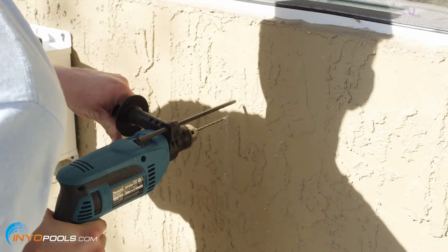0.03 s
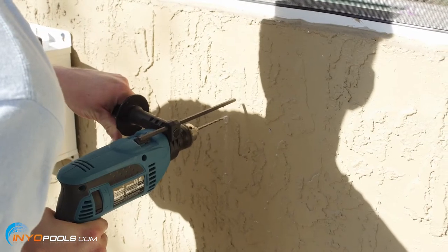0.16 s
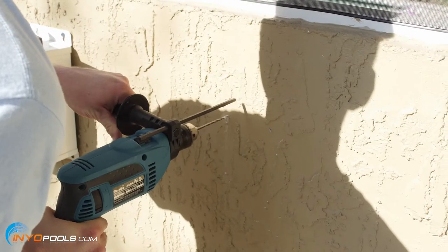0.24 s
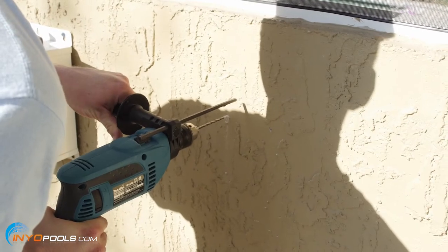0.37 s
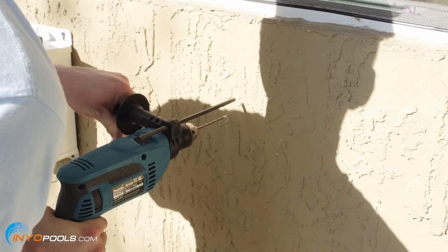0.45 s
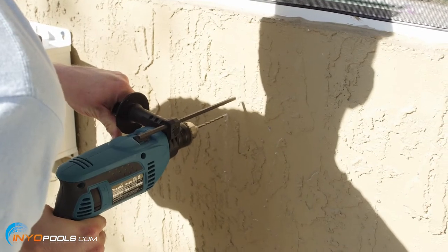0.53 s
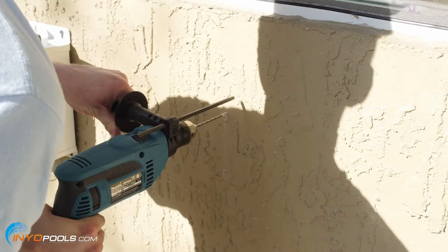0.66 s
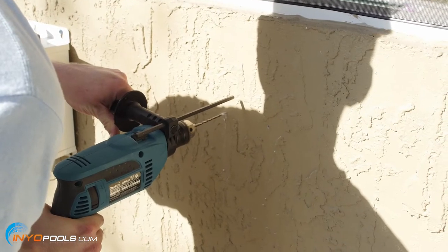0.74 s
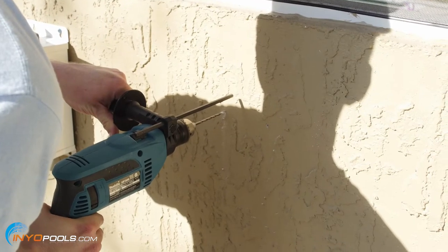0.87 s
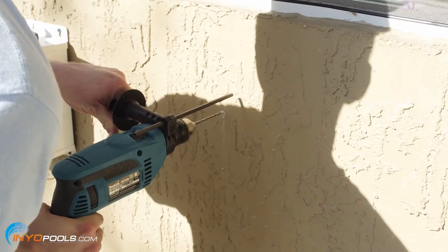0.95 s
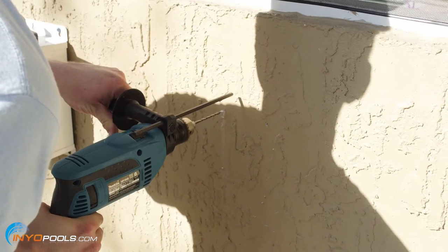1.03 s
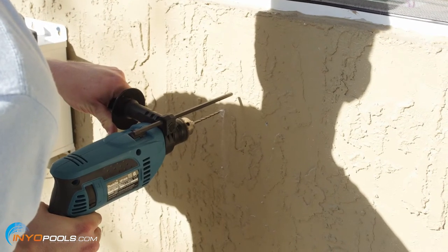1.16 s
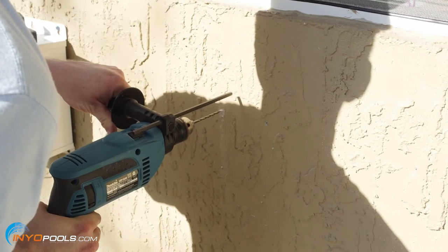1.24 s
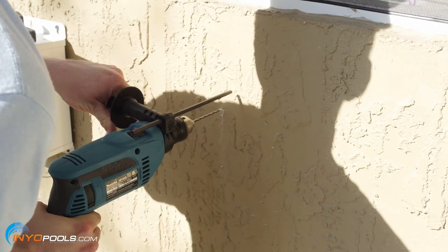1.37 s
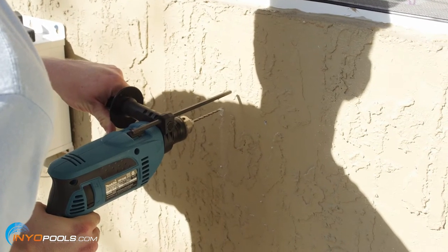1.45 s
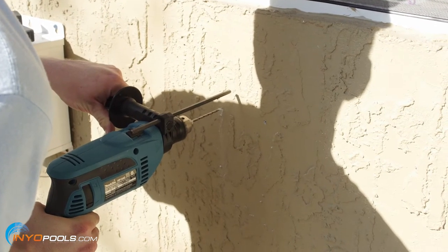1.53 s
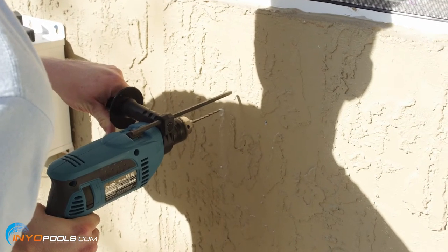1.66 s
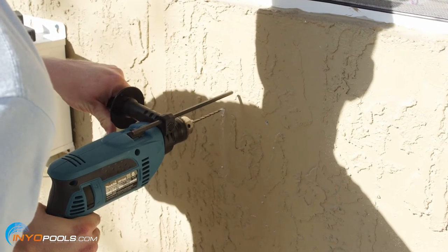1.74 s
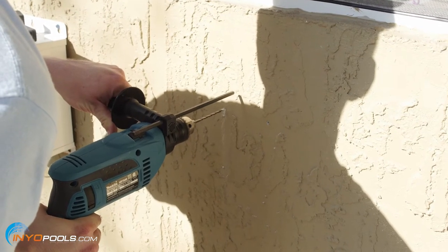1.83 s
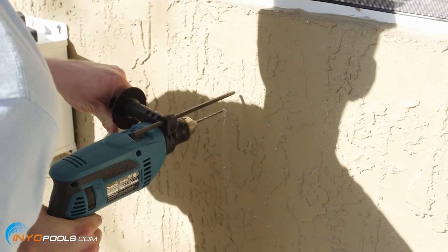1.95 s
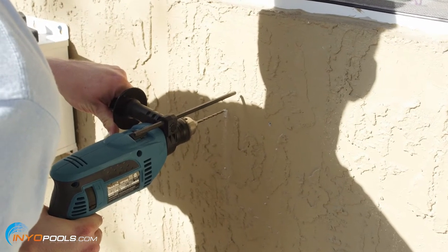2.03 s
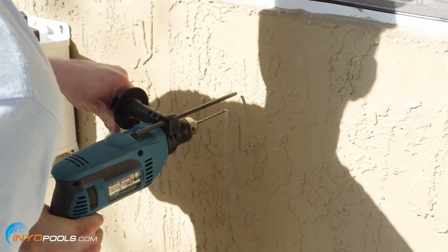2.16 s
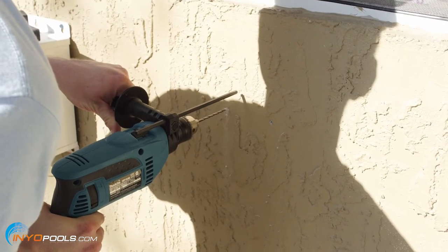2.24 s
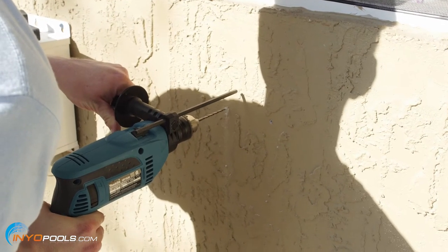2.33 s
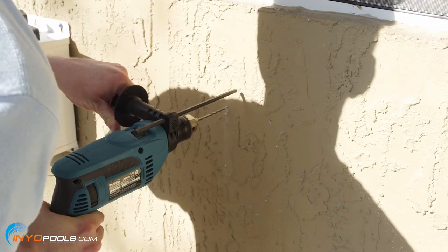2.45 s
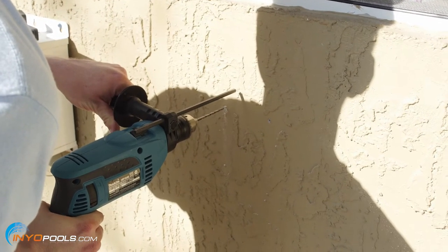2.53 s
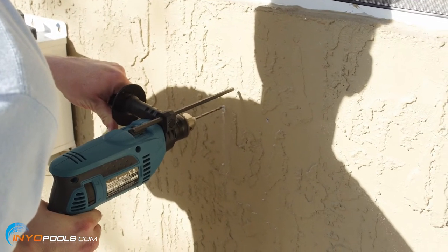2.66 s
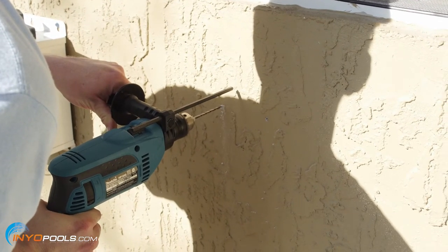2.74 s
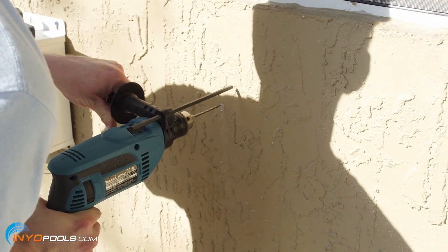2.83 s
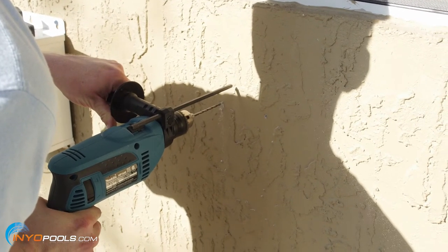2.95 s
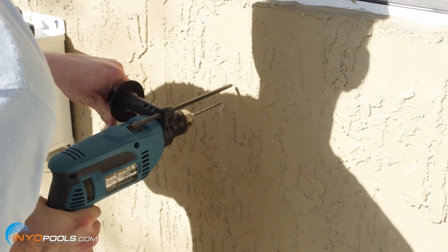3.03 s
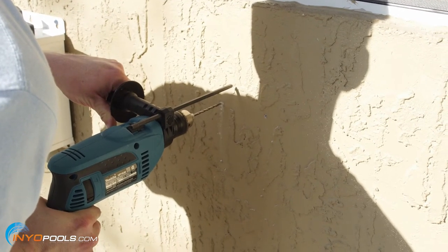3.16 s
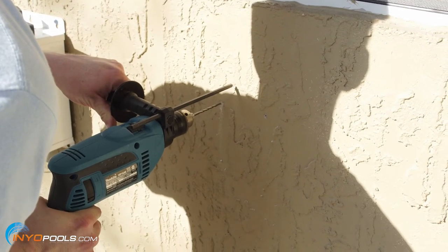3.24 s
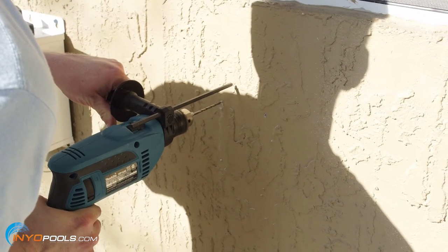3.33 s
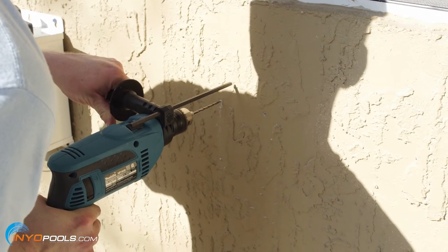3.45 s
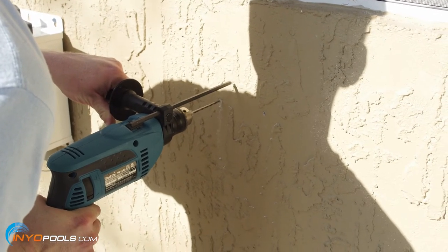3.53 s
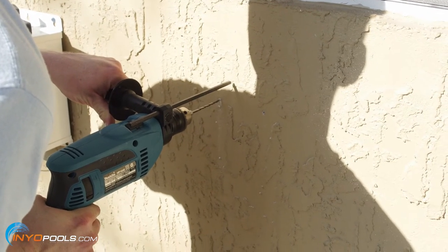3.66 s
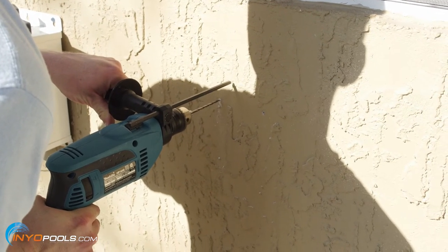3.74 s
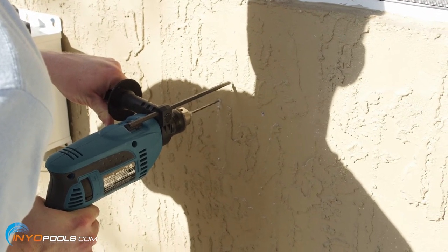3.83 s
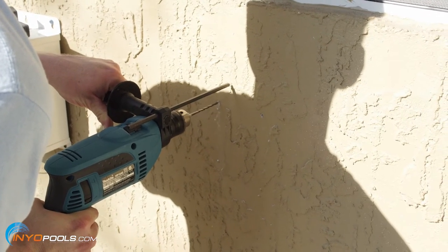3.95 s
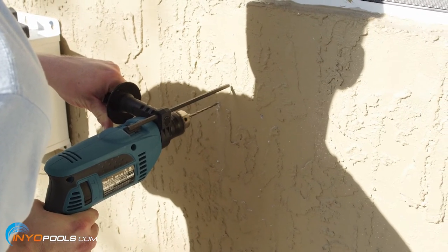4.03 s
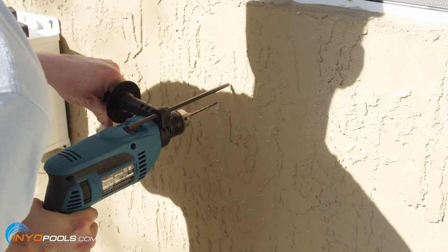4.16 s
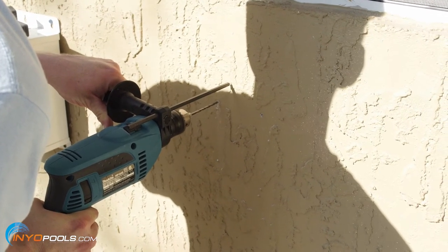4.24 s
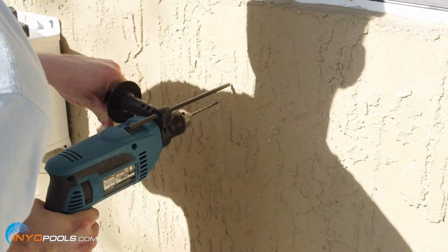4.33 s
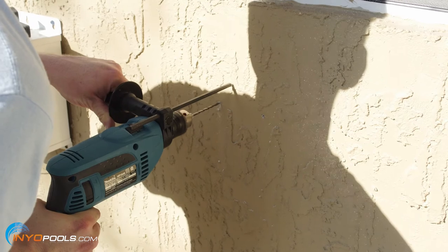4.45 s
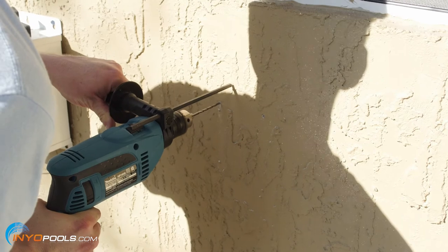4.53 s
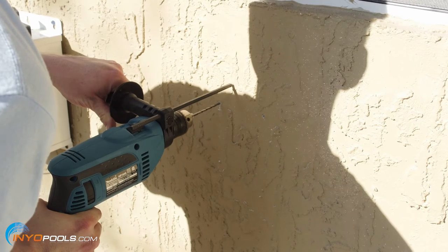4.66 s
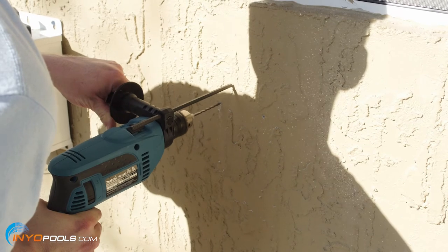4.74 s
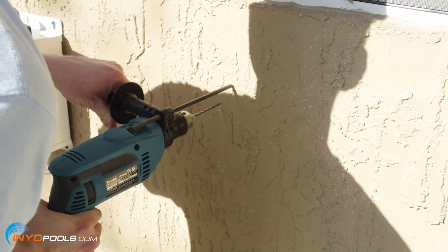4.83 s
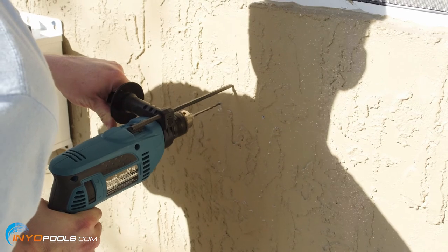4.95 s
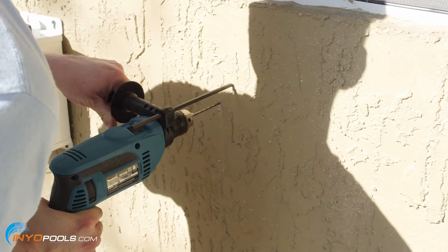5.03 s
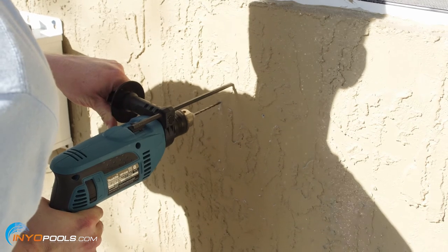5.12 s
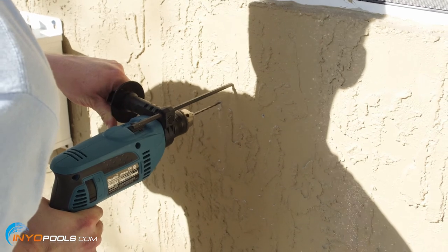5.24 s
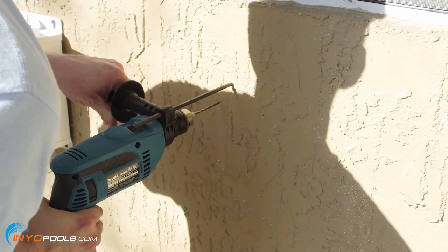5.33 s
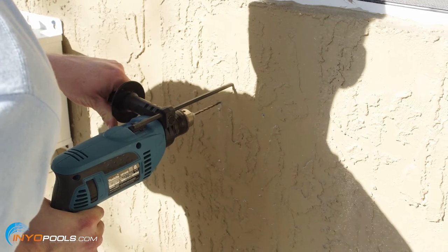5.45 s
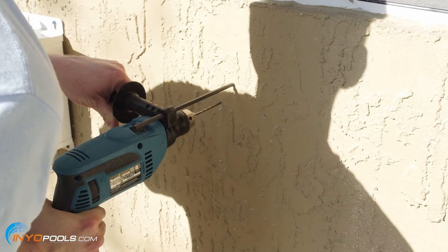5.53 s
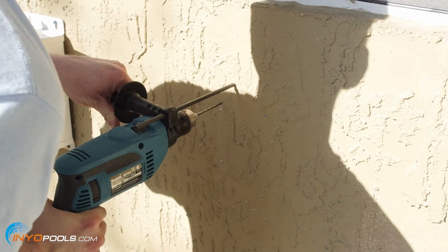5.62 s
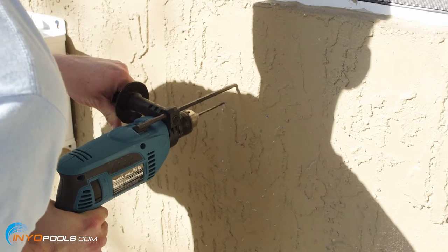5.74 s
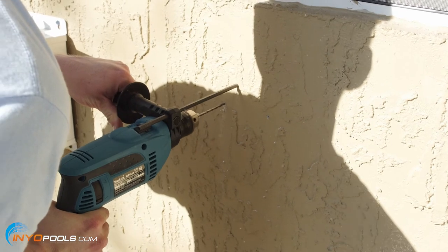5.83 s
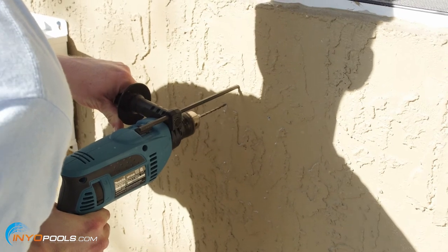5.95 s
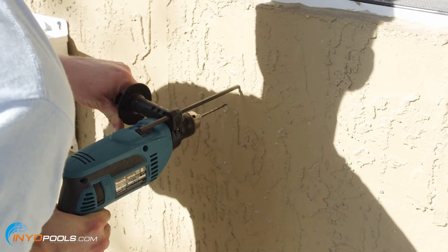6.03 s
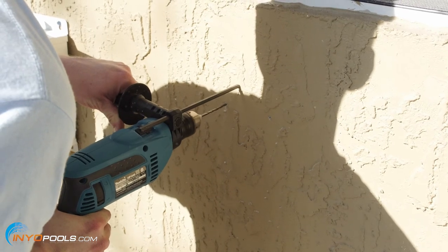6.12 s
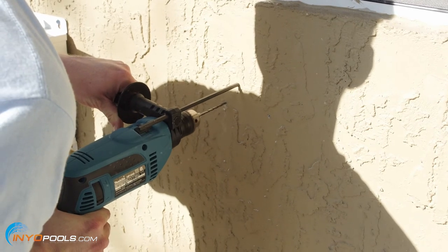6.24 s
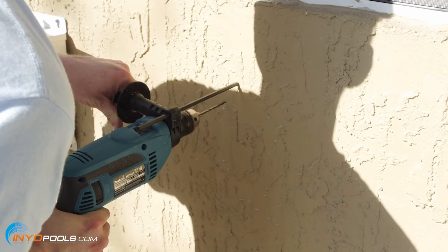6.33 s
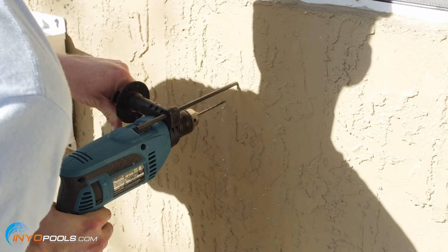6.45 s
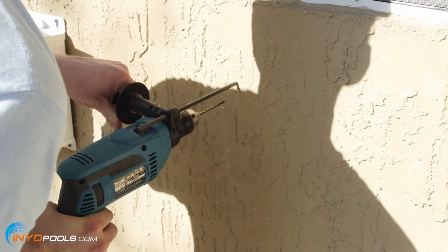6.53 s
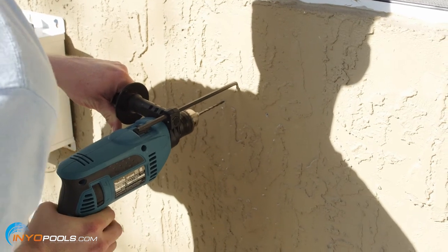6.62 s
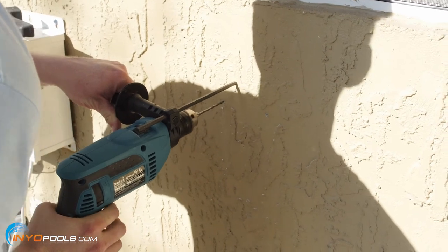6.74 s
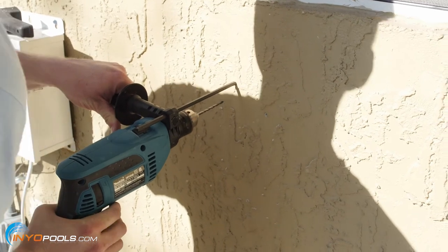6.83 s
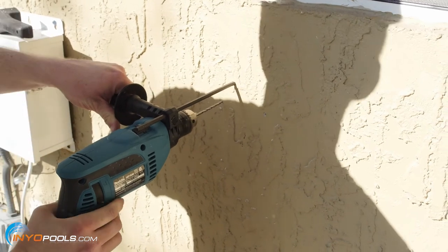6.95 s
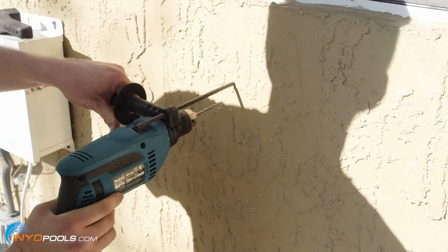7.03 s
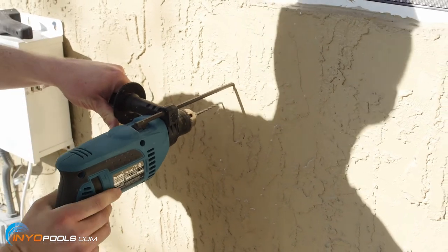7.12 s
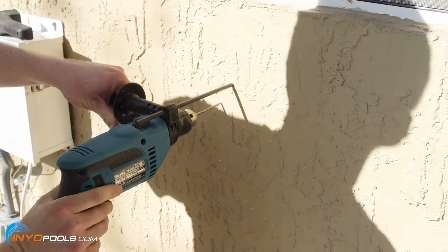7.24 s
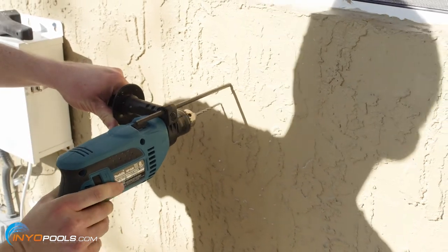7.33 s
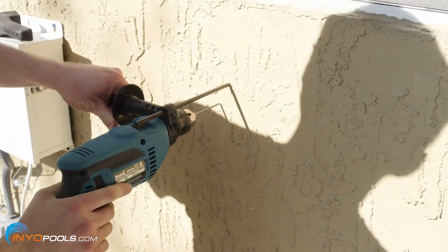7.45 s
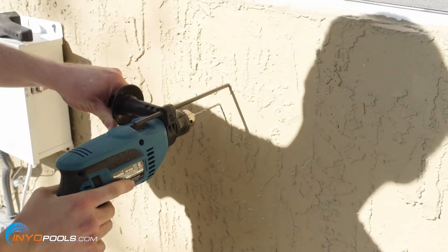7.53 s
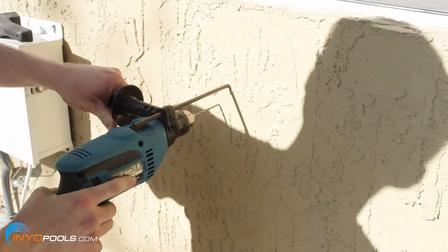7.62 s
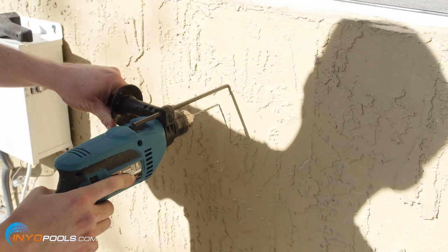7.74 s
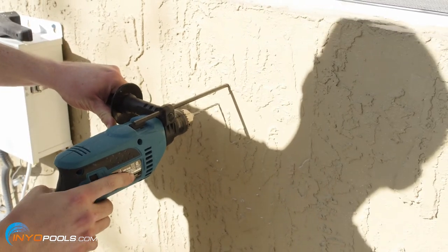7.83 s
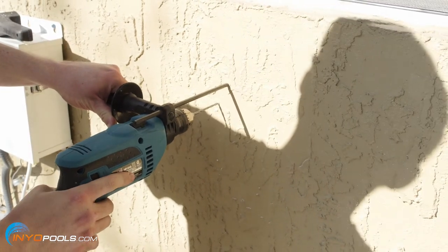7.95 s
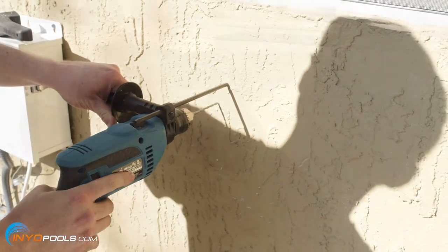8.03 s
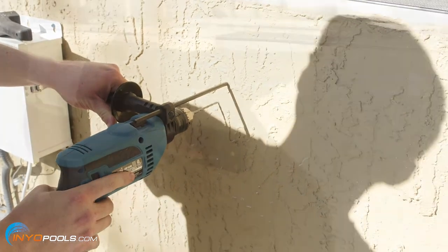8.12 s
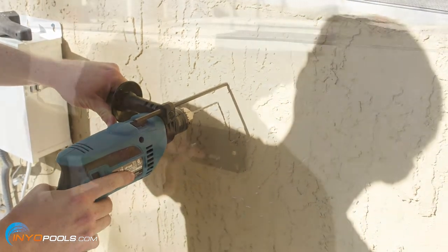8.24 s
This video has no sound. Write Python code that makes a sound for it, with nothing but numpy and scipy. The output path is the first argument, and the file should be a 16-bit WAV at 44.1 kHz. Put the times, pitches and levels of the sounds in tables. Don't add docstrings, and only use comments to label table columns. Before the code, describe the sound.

A loud electric hammer drill is already running against a stucco wall outdoors, heard close, dry and in one channel. From 0 to 0.8 seconds the bit skates: around 150 to 165 blows a second, with irregular chatter and small skips. It then catches and the rough buzz climbs to about 200 blows a second by 1.3, dips slightly, and rises to nearly 220 by 3.3. Until 5.8 it drones on fairly steadily, hard and metallic, with crushed grit and an increasingly bright steel ring. From 5.8 the hole deepens, blows weaken and a loose depth rod rattles; around 6.4 the pitch jumps as pressure eases. At about 6.55 the trigger is released, the blows dull and stop by 6.7, and motor whines with fan rush slide steeply down, vanishing around 7.7. A faint low yard hum remains, fading out by the end near 8.4.

```python
import sys
import numpy as np
from scipy import signal
from scipy.fft import rfft, irfft
from scipy.io import wavfile

SR = 44100
rng = np.random.default_rng(int(sys.argv[2]) if len(sys.argv) > 2 else 0)


def dump_mix(stems):
    frames = np.atleast_2d(stems).T
    limited = np.clip(frames, -1, 1)
    pcm = np.round(limited * 32767).astype(np.int16)
    wavfile.write(sys.argv[1], SR, pcm)


def level_to_linear(level):
    exponent = np.asarray(level, float) / 20
    return 10 ** exponent


N = 365148

RELEASE_S = 6.585


def rms_one(x):
    return x / np.sqrt(np.mean(x ** 2) + 1e-20)


def in_time(rows):
    s, *columns = np.transpose(rows)
    return [np.interp(np.arange(N) / SR, s, c) for c in columns]


def ramp(start_s, length_s):
    return np.clip((np.arange(N) / SR - start_s) / length_s, 0, 1)


def since(start_s):
    return np.maximum(np.arange(N) / SR - start_s, 0)


def colour(x, spectrum):
    hz, level_db = np.transpose(spectrum)
    bin_hz = np.arange(N // 2 + 1) * SR / N + 1
    gain = level_to_linear(np.interp(np.log(bin_hz), np.log(hz), level_db))
    return rms_one(irfft(rfft(x) * gain, N))


def noise(spectrum):
    return colour(rng.standard_normal(N), spectrum)


def resonate(x, hz, width_hz):
    r = np.exp(-np.pi * width_hz / SR)
    zeros = [(1 - r * r) / 2, 0, (r * r - 1) / 2]
    poles = [1, -2 * r * np.cos(2 * np.pi * hz / SR), r * r]
    return signal.lfilter(zeros, poles, x + 1e-18)


def hum_noise(hz, width_hz, hz_2, width_2_hz):
    return rms_one(resonate(resonate(rng.standard_normal(N), hz, width_hz), hz_2, width_2_hz))


def highpass(x, order, hz):
    return signal.sosfilt(signal.butter(order, hz, "high", fs=SR, output="sos"), x)


def clicks(at, sizes):
    return np.bincount(np.clip(at, 0, N - 1), sizes, N)


def struck(modes, at, turn, wobble_db, spread_db, lag_ms, scatter_ms):
    out = np.zeros(N)
    for hz, width_hz, level_db, side in modes:
        chance = rng.standard_normal((len(at), 2))
        sizes = level_to_linear(level_db + wobble_db * np.cos(turn + side) + spread_db * chance[:, 0])
        late = np.round((lag_ms + scatter_ms * chance[:, 1]) * SR / 1000).astype(int)
        out += resonate(resonate(clicks(at + late, sizes), hz, width_hz), hz, width_hz)
    return rms_one(out)


def yard():
    # (frequency [Hz], density [dB per Hz])
    distance = [(15, -50.5), (25, -16), (117, -2.5), (190, -10.5), (286, -1), (431, -7), (536, -7),
                (1410, -20.5), (2770, -21.5), (8000, -31.5), (10400, -46.5), (17600, -120)]
    hum = hum_noise(119.5, 14, 119.5, 16)
    ducked_db = -6.5 * (1 - ramp(RELEASE_S, 0.6))
    fade_db = -44 * since(7.77)
    level_db = -59.5 + ducked_db + fade_db
    return level_to_linear(level_db) * (level_to_linear(-6.5) * noise(distance) + level_to_linear(-12.5) * hum)


def coast():
    # (time [s], commutator rate [bars per s])
    spin = [(6.5, 4250), (6.712, 3470), (6.826, 3115), (7.056, 2225), (7.33, 1130), (7.45, 735),
            (7.55, 460), (7.75, 60)]
    # (order [sixths of the bar rate], level [dB])
    whines = [(2, -2), (3, -1), (4, -7), (5, -12), (6, 3), (8, -12), (12, 2), (18, -2), (24, -2), (30, -5),
              (36, -8), (42, -9), (48, -9), (54, -11), (60, -12), (72, -14)]
    # (frequency [Hz], gain [dB])
    housing = [(250, -26), (450, -14), (580, 3), (780, -6), (1060, 4), (1350, -7), (1680, 5), (1950, -3),
               (2350, 4), (3100, -3), (4200, -12), (5500, -7), (10000, -8), (16000, -13)]
    # (frequency [Hz], density [dB per Hz])
    fan = [(88, -74), (150, -28.5), (723, -15.5), (1030, -9), (1220, -10), (2320, -13), (2660, -16),
           (6620, -26), (8530, -28.5), (9580, -27.5), (15600, -40.5)]
    # (frequency [Hz], width [Hz], level [dB], dying slope [dB per s])
    gear_modes = [(4200, 670, -55.5, -81), (3320, 1060, -53, -40), (1560, 440, -48.5, -60)]
    dying_s = since(7.308)
    dying_db = -64 * dying_s
    sixth_hz = in_time(spin)[0] / 6
    phase = 2 * np.pi * np.cumsum(sixth_hz) / SR
    phase = phase + .035 * np.sin(phase / 4)

    whine = np.zeros(N)
    housing_hz, housing_db = np.transpose(housing)
    for order, level_db in whines:
        flutter = rms_one(resonate(rng.standard_normal(N), 5.5, 30))
        whine_hz = order * sixth_hz
        passed_db = np.interp(np.log(whine_hz), np.log(housing_hz), housing_db)
        level = level_to_linear(level_db + passed_db + 2.8 * flutter)
        whine += level * np.sin(order * phase) * (whine_hz < 15720)

    rush = noise(fan) * (1 + 0.11 * np.cos(phase / 4))
    hum = hum_noise(1040, 110, 910, 300)
    hum_db = -39 - 11 * since(RELEASE_S) + dying_db
    gears = np.zeros(N)
    for hz, width_hz, db, db_per_s in gear_modes:
        gears += level_to_linear(db + db_per_s * dying_s) * hum_noise(hz, width_hz, hz, width_hz)
    on = ramp(6.575, .03) * (1 - ramp(7.63, .15))
    motor = level_to_linear(-47 + dying_db) * whine + level_to_linear(-43 + dying_db) * rush + level_to_linear(hum_db + 3.5) * hum
    return on * (gears + motor)


def ratchet():
    # (time [s], blow rate [Hz])
    speed = [(0.0, 158), (0.2, 162), (0.4, 147), (0.6, 154.3), (0.67, 164.5), (0.78, 174), (0.86, 186),
             (1.3, 198), (1.7, 189), (2.0, 191.5), (2.47, 205.5), (3.3, 218.5), (3.5, 219), (4.9, 210),
             (5.17, 223), (5.95, 220.3), (6.46, 258), (6.72, 205)]
    # (time [s], share [blows])
    stumbles = [
        (0.496, 0.28),
        (0.601, 0.21),
        (.8, 0.52),
        (0.831, -.3),
        (6.346, 0.27),
    ]
    rate_hz = in_time(speed)[0]
    blows = np.cumsum(rate_hz) / SR
    for s, share in stumbles:
        blows = blows + share * ramp(s, .012)
    at = np.flatnonzero(np.diff(np.floor(blows)))
    turn = 2 * np.pi * np.arange(len(at)) / 16
    runout = np.clip(0.57 + 0.13 * at / SR, 0, 1)
    slip_ms = .025 * rng.standard_normal(len(at))
    slip_ms = slip_ms + .11 * runout * np.cos(turn + 2.6) + .04 * np.cos(6.9 * turn)
    at = at + np.round(slip_ms * SR / 1000).astype(int)
    return rate_hz, blows, at, turn, runout


def seating():
    # (time [s], seating [0-1])
    seat = [(0, 0.46), (0.9, 0.26), (2.2, 0.4), (2.5, 0.6), (3.5, .9), (5.0, 1), (6.0, 1), (6.3, .8),
            (6.6, 0.9)]
    return in_time(seat)[0]


def skating():
    return 1 - ramp(0.792, 0.1)


def bottomed():
    return ramp(5.81, 0.49)


def released_db():
    return -19 * ramp(RELEASE_S, .035)


def blow_level_db():
    return -14.5 - 3.5 * bottomed() + released_db()


def panel(hz):
    # (frequency [Hz], width [Hz], level [dB])
    panel_modes = [(206.8, 20.3, -29.5), (241.6, 43, -32), (353, 87, -32.5), (513, 166, -21),
                   (644, 80, -25.5), (801.4, 170, -27.5), (839, 51, -15.5), (917, 23, -9)]
    power = 0
    for mode_hz, width_hz, db in panel_modes:
        power = power + (level_to_linear(db) / (1 + (2 * (hz - mode_hz) / width_hz) ** 2)) ** 2
    return np.sqrt(power)


def thump(rate_hz, blows):
    order_db = [0, -1.5, -6, -10]
    order_lead = [.04, .18, .18, .18]
    order_eases = [0.73, 0.8, 0.32, 0.96]
    eased_db = -15.5 * ramp(6.32, .08)
    out = np.zeros(N)
    for k, (db, lead, eases) in enumerate(zip(order_db, order_lead, order_eases)):
        level = np.sqrt(2) * level_to_linear(db + eases * eased_db) * panel((k + 1) * rate_hz)
        out += level * np.sin(2 * np.pi * (k + 1) * (blows + lead) + 1.404 * k)
    return level_to_linear(.6 * released_db()) * out


def wall_ring(at, turn, runout):
    # (frequency [Hz], width [Hz], level [dB], strong side [rad])
    wall = [(971.6, 160, 0, 3.2)]
    level_db = -22 + 3.5 * seating() + 4 * skating() - 5.5 * bottomed() + released_db()
    ring = struck(wall, at, turn, wobble_db=2.5 * runout, spread_db=1.0, lag_ms=0.1, scatter_ms=0.015)
    return level_to_linear(level_db - 5.5) * ring


def case_ring(at, turn, runout):
    # (frequency [Hz], width [Hz], level [dB], strong side [rad])
    gear_case = [(2032, 230, -6, 4.5), (2300, 148, 3.5, 1.06), (2955, 174, -3.5, 0.5), (3222, 650, -3, 2),
                 (4540, 510, -7, 0.1), (4770, 99, -6.5, 11.5), (5208, 480, -4.5, 4.5),
                 (6110, 260, -19.5, 3.7), (6790, 140, -9, 3), (7680, 150, -30.5, -2.1)]
    # (frequency [Hz], width [Hz], level [dB], strong side [rad])
    wall_face = [(1079.5, 74, -2.9, 2), (1268, 284, 2, 1.97), (1417, 220, -0.69, 3.5)]
    # (frequency [Hz], width [Hz], level [dB], strong side [rad])
    depth_rod = [(1850, 300, 0, 0), (2050, 300, -2, 1.0), (2420, 300, -2, 2.0)]
    case = struck(gear_case, at, turn, wobble_db=2.4 * runout, spread_db=1.1, lag_ms=0, scatter_ms=.014)
    echo_ms, echo_db = .66, -5.5
    case = rms_one(case + level_to_linear(echo_db) * np.roll(case, round(echo_ms * SR / 1000)))
    sway_ms = .03 * runout * np.cos(turn + 2.6)
    face_at = at + np.round(sway_ms * SR / 1000).astype(int)
    face = struck(wall_face, face_at, turn, wobble_db=3.8 * runout, spread_db=1.0, lag_ms=.2, scatter_ms=.015)
    rod = struck(depth_rod, at, turn, wobble_db=1.0, spread_db=3.5, lag_ms=0.15, scatter_ms=.05)
    case = case + level_to_linear(-8.5 + 4.5 * seating()) * face + level_to_linear(-1.5) * ramp(5.85, 0.11) * rod
    return level_to_linear(blow_level_db() - 6.5 - 1.5 * bottomed()) * case


def bit_ring(at, turn):
    # (frequency [Hz], width [Hz], level [dB], strong side [rad])
    steel = [(9680, 330, -8, 1.8), (10400, 300, -16, 1.3), (13660, 260, -23, 1.6)]
    # (frequency [Hz], width [Hz], level [dB], strong side [rad])
    shank = [(10085, 62, 0, .8)]
    level_db = -47.5 + 14 * seating() + released_db()
    bit = struck(steel, at, turn, wobble_db=2.0, spread_db=1.8, lag_ms=.3, scatter_ms=.03)
    bit = bit + level_to_linear(1.5) * struck(shank, at, turn, wobble_db=1.5, spread_db=2.0, lag_ms=0.2, scatter_ms=0.05)
    return level_to_linear(level_db - 4.5) * bit


def chuck_ring(at, turn):
    # (frequency [Hz], width [Hz], level [dB], strong side [rad])
    jaws = [(8650, 200, -4, 2.3), (8930, 260, 0, 2.4)]
    level_db = -55 + 9 * seating() + 3.5 * skating() + 1.5 * since(0) + released_db()
    ring = struck(jaws, at, turn, wobble_db=2.5, spread_db=2.0, lag_ms=.3, scatter_ms=.03)
    return level_to_linear(level_db - 5.5) * ring


def skate_ring(at, turn):
    # (frequency [Hz], width [Hz], level [dB], strong side [rad])
    surface = [(516, 30, 7, -6), (832, 74, 4.5, 3.5), (1440, 140, -3.5, 2.0), (1792, 73, 0.5, -2)]
    ring = struck(surface, at, turn, wobble_db=2.0, spread_db=4.0, lag_ms=.2, scatter_ms=.08)
    return level_to_linear(blow_level_db() - 11) * skating() * ring


def grit(at, turn):
    # (frequency [Hz], density [dB per Hz])
    crushed = [(100, -59), (170, -22), (300, -17.5), (450, -4), (700, -3.5), (1200, 0.5), (2600, -2.5),
               (3200, -4.5), (4000, -4.5), (5500, -12.5), (8000, -19), (10000, -12.5), (11500, -24),
               (16000, -31)]
    decay = np.exp(-1000 / (.7 * SR))
    sizes = level_to_linear(1.5 * rng.standard_normal(len(at)) + 2.2 * np.cos(turn + 1.5))
    bursts = rms_one(signal.lfilter([1], [1, -2 * decay, decay ** 2], clicks(at + 6, sizes)))
    grind = .6
    level_db = blow_level_db() - 9.5 + 1.5 * bottomed()
    return level_to_linear(level_db) * colour((bursts + grind) * rng.standard_normal(N), crushed)


def hammer():
    rate_hz, blows, at, turn, runout = ratchet()
    bodies = wall_ring(at, turn, runout) + case_ring(at, turn, runout)
    bodies = bodies + bit_ring(at, turn) + chuck_ring(at, turn)
    bodies = highpass(bodies, 4, 720) + skate_ring(at, turn)
    drill = thump(rate_hz, blows) + bodies + grit(at, turn)
    lows = signal.sosfilt(signal.butter(2, 4000, fs=SR, output="sos"), drill)
    drill = drill + .55 * ramp(6.515, 0.042) * (lows - drill)
    lopsided = 0.5 * np.tanh((drill + .45 * drill ** 2) / 0.46)
    on = 1 - ramp(6.677, 0.043)
    return on * highpass(lopsided, 6, 128)


def scene():
    return (yard() + coast() + hammer())[None]


def band_limit(x):
    return signal.sosfilt(signal.butter(12, 15720, fs=SR, output="sos"), x)


def record(dry):
    return band_limit(dry)


dry = scene()
out = record(dry)
dump_mix(out)
```